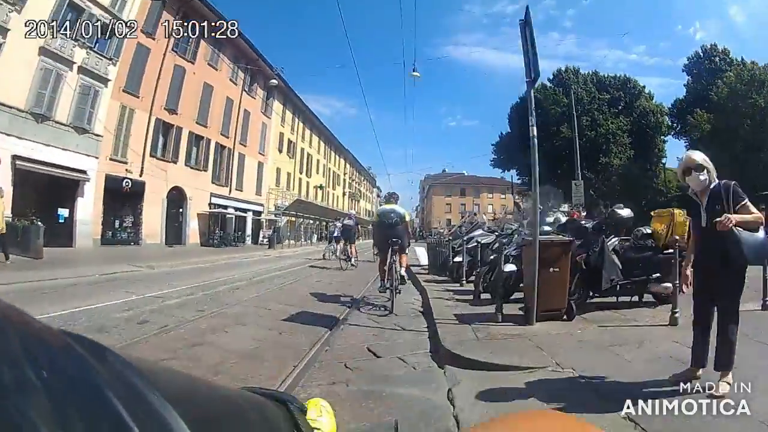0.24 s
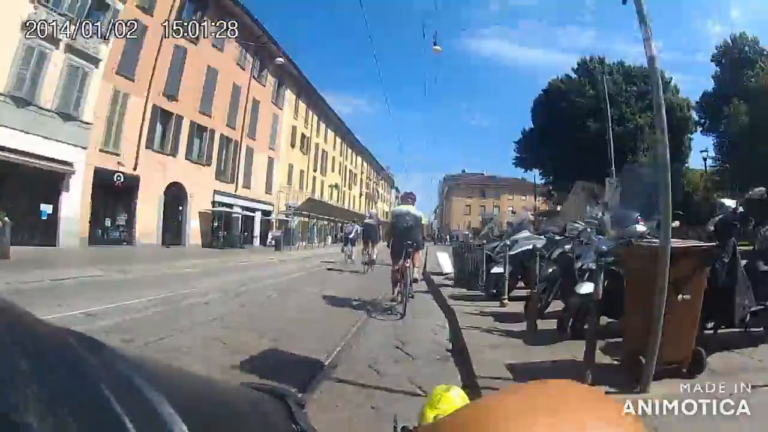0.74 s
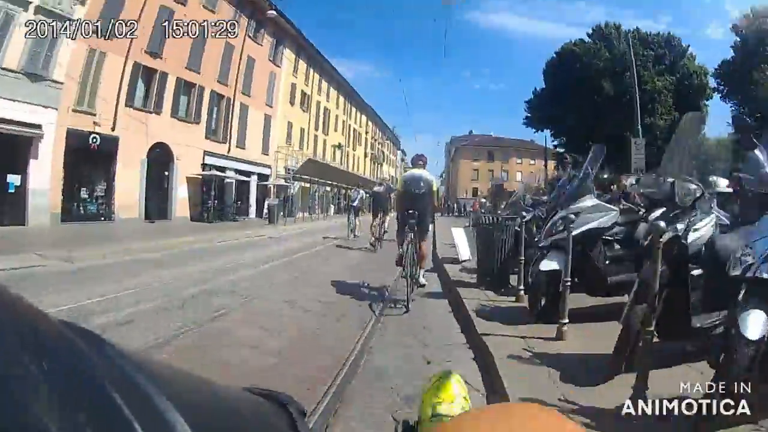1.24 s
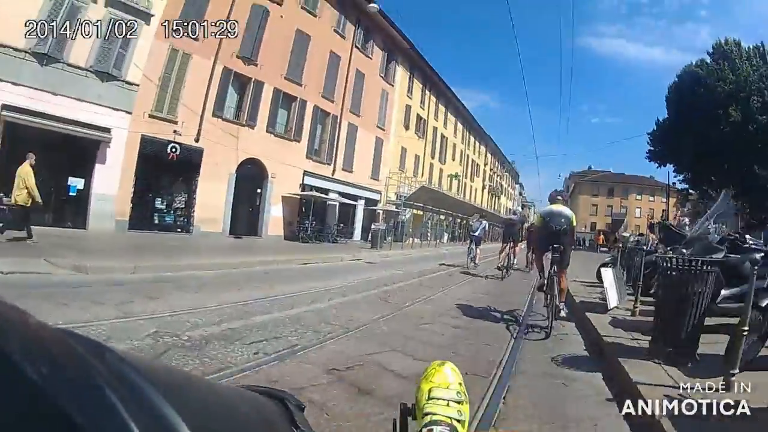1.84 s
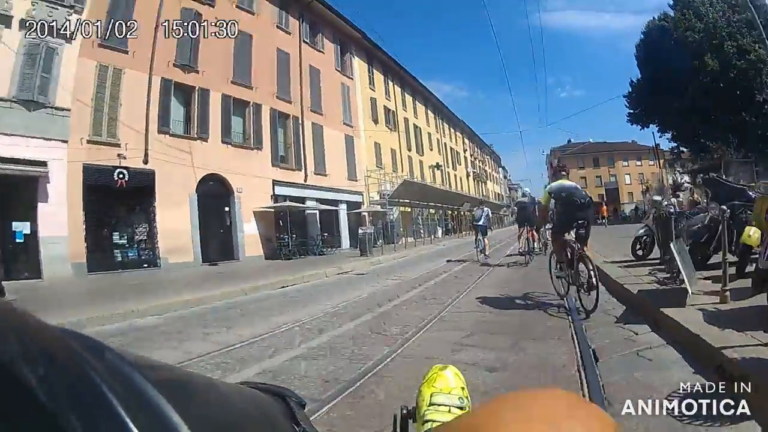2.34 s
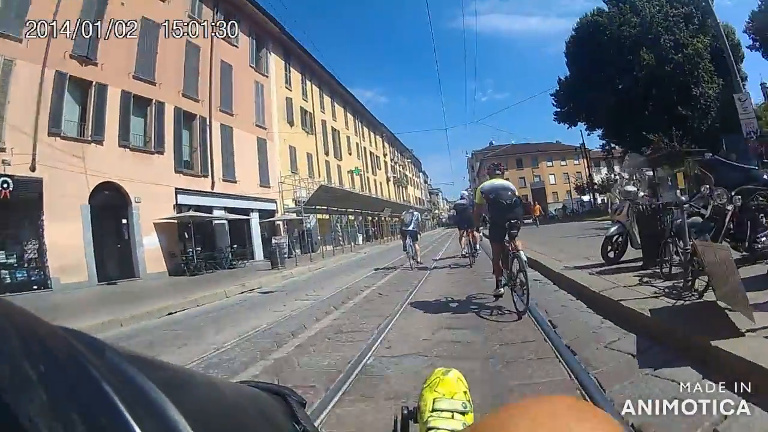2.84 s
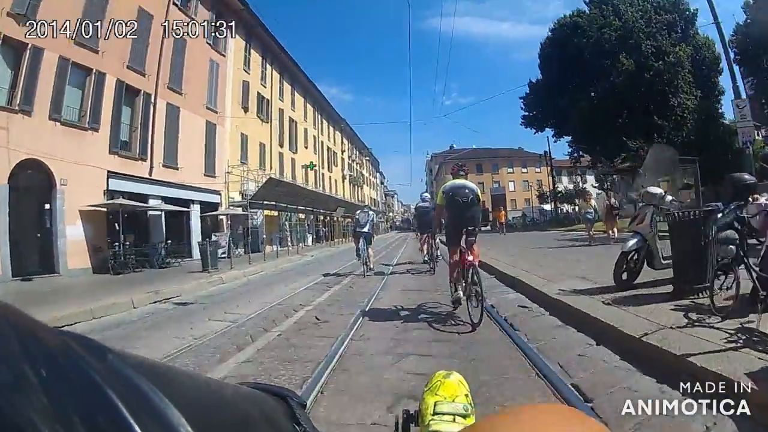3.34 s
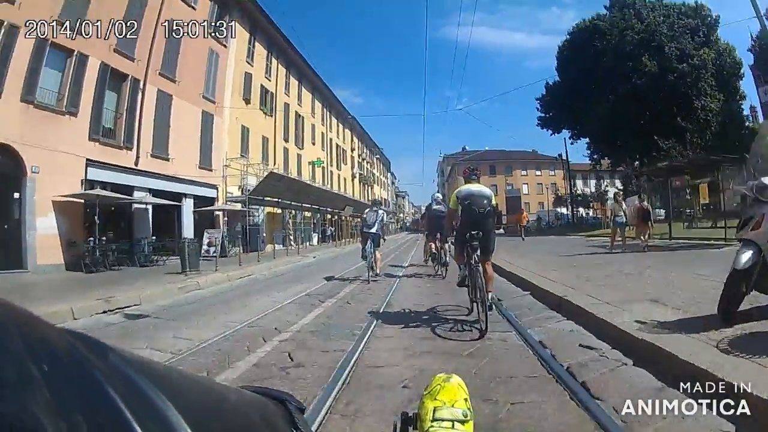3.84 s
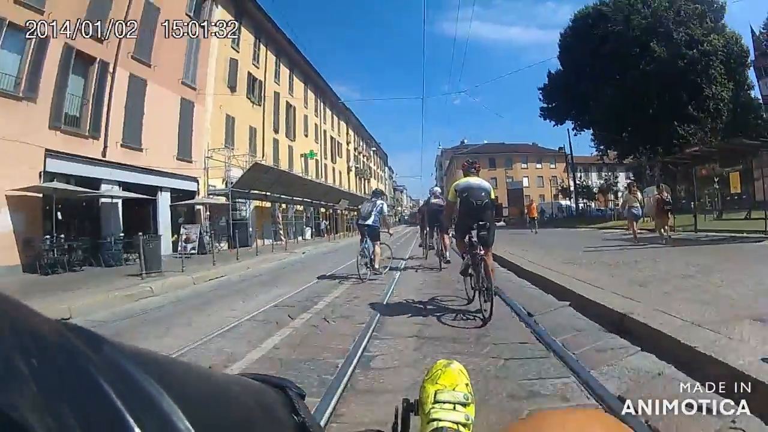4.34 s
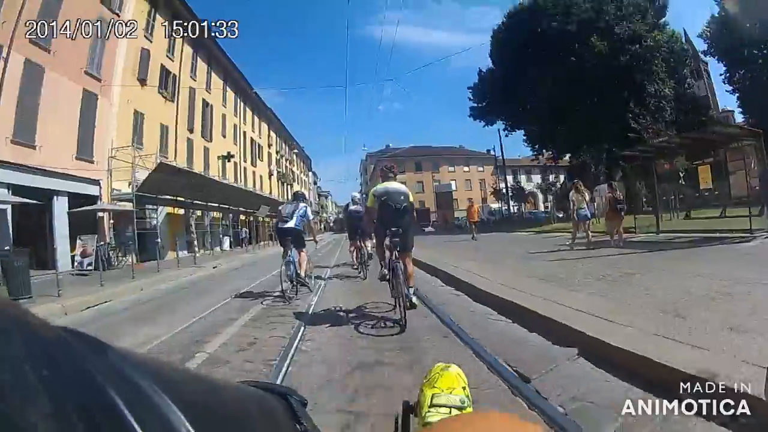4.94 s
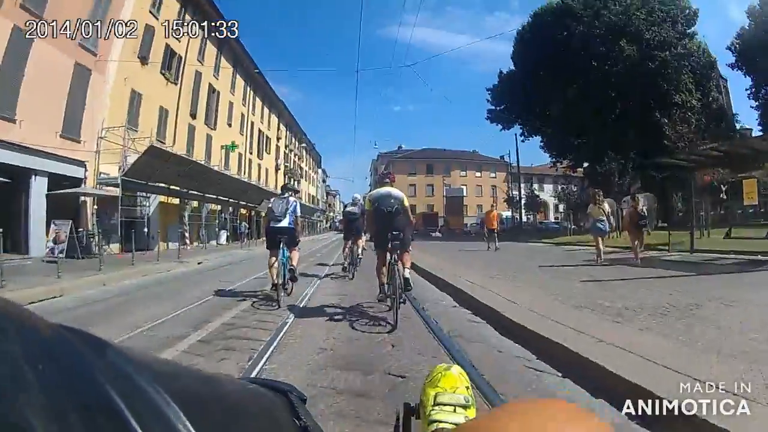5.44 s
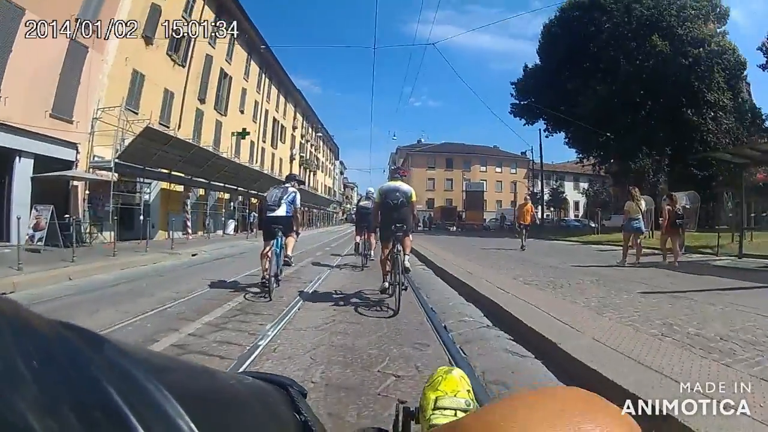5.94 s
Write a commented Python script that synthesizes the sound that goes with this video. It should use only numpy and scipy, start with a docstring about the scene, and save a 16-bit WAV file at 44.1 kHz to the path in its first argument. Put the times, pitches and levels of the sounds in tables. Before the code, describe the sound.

A camera in a closed case, fixed to a pedal trike, picks up about six seconds of stone paving. Rough tyre grind, low frame hum, gritty ticks and tiny jingling parts start at once, with a hard knock almost immediately. From 0.3 to 1.1 s knocks crowd together, the strongest near 0.47 s crunching the microphone, with short bursts of rattling and hollow woody thumps. Chatter is sparser until 1.85 s; from about 2.5 to 3.5 s the grind sinks, though single knocks persist near 2.9, 3.04 and 3.4 s. Chain links tick quickly, about thirty a second, faster around 2.5 s and 5.8 s. Roughness surges at 3.6-4.1 s with clattering jolts. Thin squeaks slide up and back down at 4.4 and 4.6 s, with a faint echo. Hard knocks return at 5.3 s and 5.95 s over a quieter grind. Treble stays muffled, sound close and dry.

```python
"""Tyres grind over rough stone from the start, with gritty ticks, jingling parts and a hard knock almost at
once. It is a pedal trike on stone paving, heard by a camera in a closed case fixed to the frame. Road noise is
shaped random contacts and hum; knocks, thumps, chain ticks and loose parts are short dying rings. Jolts set off
bursts of chatter; later something squeaks twice, as two sliding tones. The hardest knocks overload the
microphone, and there is little treble above about 5 kHz."""
import sys
import numpy as np
from scipy import signal
from scipy.fft import rfft, irfft, next_fast_len
from scipy.io import wavfile
from scipy.ndimage import map_coordinates

SR = 44100
rng = np.random.default_rng(int(sys.argv[2]) if len(sys.argv) > 2 else 0)


def unload_wav(signal):
    """Save mono or channel-first audio to the path in sys.argv[1] as 16-bit WAV at rate SR, clipped to [-1, 1]."""
    wavfile.write(
        sys.argv[1],
        SR,
        np.round(np.clip(np.atleast_2d(signal).T, -1, 1) * 32767).astype(np.int16),
    )


N = 272538

# Tyres on the stone as the ride goes on: t/s, grind level/dB, frame hum level/dB (before each layer's own gain)
ROAD_LEVELS = [(0.0, -28, -40), (0.14, -25, -37.5), (0.58, -26.5, -38.5), (0.95, -25, -36.5),
               (1.38, -27, -40.5), (2.05, -26, -42), (2.58, -32, -44.5), (3.44, -33, -43), (3.72, -24, -41),
               (4.1, -30, -40.5), (4.39, -28.5, -43.5), (5.18, -28, -43.5), (5.73, -34, -47),
               (6.18, -28.5, -42)]
# Tone colour of the tyre grind: f/Hz, relative level per Hz/dB
GRIND_SPECTRUM = [(300, -46), (900, -18), (1150, -13.5), (1370, 4), (1580, -10.5), (1950, 2), (2400, -12.5),
                  (2850, -8), (3600, -20), (4500, -21.5), (6000, -26.5), (12000, -31.5)]
# Tone colour of the frame hum: f/Hz, relative level per Hz/dB
HUM_SPECTRUM = [(20, -29.5), (60, -13.5), (160, -25.5), (280, -15.5), (400, -13.5), (510, -5), (610, -2),
                (740, -3.5), (950, -13), (1400, -29), (3000, -74)]
# Hard knocks of the mount: t/s, level/dB (before the gain in knocks)
HARD_KNOCKS = [(0.026, 7.5), (0.2, 0.5), (0.341, 2.5), (0.347, 6), (0.4126, 3), (0.4633, 4), (0.4719, 11),
               (0.5393, 8.5), (0.5597, -9.5), (0.6004, 0), (0.7035, -3), (0.7536, -1.5), (0.7778, 5.5),
               (0.835, 1.5), (0.897, 6), (0.9222, -6.5), (0.9499, -2.5), (1.0217, -1), (1.1231, -1),
               (1.283, 0), (1.4214, -6), (1.535, -4), (1.7654, 4), (1.8347, 3.5), (1.9478, -9.5),
               (2.2943, 1.5), (2.495, -5.5), (2.591, -6), (2.7367, -12), (2.882, 5.5), (3.011, 2),
               (3.0372, 5.5), (3.1844, -11.5), (3.2111, -3.5), (3.379, 5.5), (3.5978, 1), (3.736, -5.5),
               (3.9002, 4.5), (3.9357, 3), (3.9517, -3), (3.961, 1), (4.0085, 4.5), (4.104, -6),
               (4.2143, 0), (4.3695, 1.5), (4.7863, -9.5), (5.157, 0.5), (5.2819, 5.5), (5.34, 7.5),
               (5.4886, -4), (5.5844, -8), (5.7889, -10.5), (5.9547, 5.5), (6.0092, -2)]
# What the mount rings with beside its main pitch: f/Hz, level/dB, time to fall 60 dB/s
MOUNT_MODES = [(528, -33.5, .025), (1355, -13, 0.022), (1928, -7.5, 0.011), (2337, -12, 0.0073),
               (2842, -8, 0.0099), (3275, -15.5, 0.0082), (3792, -15.5, 0.0078), (4480, -15.5, .006)]
# The chain's pace and pull: t/s, links per second/Hz, tick level/dB (before the gain in chain)
CHAIN_PACE = [(0, 33.8, -25), (1.1, 31, -25), (2.15, 36.5, -26), (2.45, 56, -21.5), (2.85, 49, -26),
              (3.15, 31.2, -28), (3.7, 30.2, -20.5), (4.55, 25, -17), (4.75, 40, -19.5), (5.7, 48, -19),
              (5.88, 58.4, -17.5), (6.05, 32.5, -19.5)]
# What a chain link rings with: f/Hz, level/dB, time to fall 60 dB/s
LINK_MODES = [(1287, -12.5, 0.015), (1760, -9, 0.014), (2045, -2.5, 0.019), (2570, -8.5, 0.0044),
              (2690, -8, 0.014), (3370, -13.5, 0.0026)]
# Loose parts chatter after a jolt: t/s, length/s, level/dB (before each layer's own gain)
JOLTS = [(0.369, 0.014, -9), (0.428, 0.021, -19.5), (0.47, 0.015, -5.5), (0.494, 0.015, -5),
         (0.531, 0.012, -8), (0.703, 0.024, -12), (0.771, 0.018, -10.5), (0.805, 0.011, -7),
         (0.824, 0.027, -18), (0.94, 0.029, -17.5), (1.125, 0.011, -5), (1.473, 0.022, -22.5),
         (1.55, 0.022, -21), (1.846, 0.03, -12.5), (2.132, 0.0087, -21), (3.536, 0.016, -13),
         (3.668, 0.012, -17.5), (3.881, 0.019, -17), (3.961, 0.012, -13.5), (4.009, 0.02, -4.5),
         (4.039, 0.023, -6.5), (4.296, 0.014, -14.5), (4.365, 0.006, -9), (5.156, 0.022, -14.5)]
# Resonances of the case under chatter: f/Hz, width/Hz, relative level/dB
CASE_MODES = [(1310, 184, -0.5), (1723, 930, -4), (2030, 282, 0), (2760, 190, -11), (3600, 2300, -18)]
# Resonances of the frame under chatter: f/Hz, width/Hz, relative level/dB
FRAME_MODES = [(519, 68.6, 2), (755, 124, 3.5), (930, 980, -8.5)]
# Squeaks: t/s, slide up/s, lull/s, slide down/s
SQUEAK_TIMES = [(4.408, .041, .058, 0.023), (4.625, .022, .079, 0.051)]
# How the treble falls away: f/Hz, level/dB
TREBLE_CUT = [(2500, 0), (3300, -3.5), (4300, -9), (5000, -16), (5700, -26.5), (6300, -35.5),
              (7500, -34.5), (8200, -49), (9000, -28), (10500, -23.5), (13000, -27.5), (15000, -25),
              (16000, -40.5)]

# The road noise swells around a jolt: level against it, reach in time
SHAKE_DB, SHAKE_S = -16, 0.048
# Main pitch that the mount settles on, its scatter from knock to knock as a fraction
KNOCK_HZ, KNOCK_SPREAD = 1359, 0.031
# Light taps of the mount: level over the tyre grind before the gain in knocks, its spread
TAP_DB, TAP_SPREAD_DB = 9, 3.5
# Hollow thumps of the frame: pitch, its scatter in natural-log units
THUMP_HZ, THUMP_SPREAD = 749, 0.04
# A paving joint: level over the frame hum before the gains in thumps, its spread
JOINT_DB, JOINT_SPREAD_DB = 16.5, 2
# The frame lands again after each hard knock: delay, level before the gains in thumps
REBOUND_S, REBOUND_DB = 0.027, -29
# The frame's boom in a 0 dB jolt; dB it gains per dB of jolt
BOOM_DB, BOOM_GROWS = -10.5, 0.69
# Ends of the squeak slides, and the faint note between; levels are before the resonance
SQUEAK_LOW_HZ, SQUEAK_HIGH_HZ, SQUEAK_DB = 2880, 3700, -6.5
LULL_HZ, LULL_DB = 2290, -14
# The slides are loudest as they pass this resonance
SQUEAK_BODY_HZ, SQUEAK_WIDTH_HZ = 3300, 164


def amp(db):
    """Turn decibels into a plain gain."""
    return 10 ** (np.asarray(db) / 20)


def unit(x):
    """Scale a sound to rms 1."""
    return x / np.sqrt(np.mean(x ** 2) + 1e-20)


def along(points, hz):
    """Read a (Hz, value) curve at any frequency, along a log axis."""
    f, value = np.transpose(points)
    return np.interp(np.log(hz + 1), np.log(f + 1), value)


def curves(rows):
    """Give one value per sample for each column after the time."""
    s, *columns = np.transpose(rows)
    return [np.interp(np.arange(N) / SR, s, column) for column in columns]


def wobble(rate):
    """Draw a smooth random curve with so many knots a second."""
    knots = rng.standard_normal(int(N * rate / SR) + 4)
    return map_coordinates(knots, [np.arange(N) * rate / SR])


def bounded_normal(size):
    """Draw bell-shaped random numbers held between -2 and 2."""
    return np.clip(rng.standard_normal(size), -2, 2)


def scattered(count):
    """Pick sample positions, one at a chance moment in each equal stretch of the ride."""
    return ((np.arange(count) + rng.random(count)) * N / count).astype(int)


def filtered(x, response):
    """Shape a sound by a complex response to frequency."""
    padded = next_fast_len(N + SR // 2)
    spectrum = rfft(x, padded) * response(np.fft.rfftfreq(padded, 1 / SR))
    return irfft(spectrum, padded)[..., :N]


def resonate(x, modes):
    """Ring a sound through (Hz, width, dB) resonances, keeping the power of white noise."""
    def response(f):
        total = 0
        for k, (centre, width, db) in enumerate(modes):
            peak = 1j * f * width / (centre * centre - f * f + 1j * f * width)
            # each resonance radiates poorly below its own pitch
            radiation = 1j * f / (centre + 1j * f)
            total = total + (-1) ** k * amp(db) * peak * radiation
        return total / np.sqrt(np.mean(np.abs(total) ** 2))
    return filtered(x, response)


def add(track, s, sound):
    """Mix a sound into the track at time s."""
    part = track[max(round(s * SR), 0):][:len(sound)]
    part += sound[:len(part)]


def contacts(rate, spread_db):
    """Make tiny impacts of uneven size at random moments, rms 1."""
    hits = rng.random(N) < rate / SR
    signs = rng.choice([-1, 1], N)
    return unit(hits * signs * amp(spread_db * bounded_normal(N)))


def pings(times, db, hz, cycles, attack):
    """Make short damped rings that die by 60 dB in so many cycles, each with its own time, level and pitch."""
    t = np.arange(SR // 60) / SR
    turns = hz[:, None] * t
    decay = amp(db[:, None] - 60 * turns / cycles)
    rings = decay * np.sin(2 * np.pi * turns) * (1 - np.exp(-t / attack))
    at = np.maximum(times * SR, 0).astype(int)[:, None] + np.arange(len(t))
    return np.bincount(at.ravel(), rings.ravel(), N)[:N]


def roughness():
    """Follow the paving's grind level in dB per sample, adding the power of a swell around each jolt."""
    s = np.arange(0, N, 100) / SR  # a coarse time grid is enough for the swells
    shake = np.zeros(len(s))
    for start, length, db in JOLTS:
        distance = np.abs(s - start - length / 2)
        shake += amp(db + SHAKE_DB) ** 2 * np.exp(-distance / SHAKE_S)
    paving = amp(curves(ROAD_LEVELS)[0]) ** 2
    return 10 * np.log10(paving + np.interp(np.arange(N) / SR, s, shake))


def tyres(road_db, grind_db=-4, hum_db=0):
    """Rough stone shakes the frame in quick bumps, heard as a grind of tiny contacts and a low hum."""
    hum_level = curves(ROAD_LEVELS)[1]
    bumps = wobble(150)
    grind = unit(filtered(contacts(rate=3600, spread_db=0.0), lambda f: amp(along(GRIND_SPECTRUM, f))))
    hum = unit(filtered(rng.standard_normal(N), lambda f: amp(along(HUM_SPECTRUM, f))))
    grind_gain = amp(road_db + grind_db + 5.57 * bumps)
    hum_gain = amp(hum_level + hum_db + 2 * bumps + 1.8 * wobble(45))
    return grind_gain * grind + hum_gain * hum


def grit(road_db, count=700, centre_hz=3900, spread=0.091, level_db=-11, size_db=5, cycles=45,
         attack=0.0001, crush_db=-12):
    """Sand grains snap under the tyres as bright little ticks, and crunch in a cluster under each jolt."""
    at = rng.integers(0, N, count)
    loose = np.c_[at / SR, road_db[at] + level_db]
    crushed = [(s + length * u, db + crush_db) for s, length, db in JOLTS for u in rng.random(size=8)]
    times, db = np.vstack([loose, crushed]).T
    size, pitch = bounded_normal((2, len(times)))
    return pings(times, db + size_db * size, centre_hz * np.exp(spread * pitch), cycles, attack)


def jingling(road_db, count=420, centre_hz=1850, spread=0.2, level_db=7, cycles=20, attack=0.00036,
             size_db=5):
    """Small loose parts tap all the time, harder on rougher stone, each at its own pitch."""
    at = scattered(count)
    size, pitch = bounded_normal((2, count))
    db = road_db[at] + level_db + size_db * size
    return pings(at / SR, db, centre_hz * np.exp(spread * pitch), cycles, attack)


def taps(road_db):
    """Place light knocks of the mount at chance moments, stronger on rougher stone, as (s, dB)."""
    at = scattered(count=26)
    db = road_db[at] + TAP_DB + TAP_SPREAD_DB * bounded_normal(len(at))
    return list(zip(at / SR, db))


def knocks(blows, t60=0.0105, attack=0.001, crack_db=-13, crack_t60=0.0021, level_db=1.5, detune=0.049,
           stiff=0.37, release=0.001806, size_db=3.5):
    """Each knock rings the mount for a few milliseconds, with a short noisy crack at its start."""
    out, t = np.zeros(N), np.arange(SR // 20) / SR
    # while the parts touch the mount is stiffer, so the main ring starts higher and settles
    bent_time = t - stiff * release * np.exp(-t / release)
    swell = 1 - np.exp(-(t / attack) ** 2)
    for s, db in blows:
        main_hz = KNOCK_HZ * (1 + KNOCK_SPREAD * rng.standard_normal())
        ring = np.sin(2 * np.pi * main_hz * bent_time) * amp(-60 * t / t60)
        for mode_hz, mode_db, mode_t60 in MOUNT_MODES:
            hz = mode_hz * (1 + detune * rng.standard_normal())
            wave = np.sin(2 * np.pi * (hz * t + rng.random()))
            ring += amp(mode_db + size_db * rng.standard_normal() - 60 * t / mode_t60) * wave
        crack = amp(crack_db - 60 * t / crack_t60) * rng.standard_normal(len(t))
        add(out, s, amp(db + level_db) * (2 * ring * swell + crack))
    return out


def chain(size_db=2, detune=0.03, level_db=11, rise=0.0027, stiff=0.2):
    """Each link slides onto a tooth with a soft metallic tick that sinks as it seats; the pace follows the pedals."""
    out, t = np.zeros(N), np.arange(SR // 30) / SR
    pace, tick_db = curves(CHAIN_PACE)
    # a link seats each time the running count passes a whole number
    seats = np.flatnonzero(np.diff(np.floor(np.cumsum(pace) / SR)))
    bent_time = t - stiff * rise * np.exp(-t / rise)
    swell = 1 - np.exp(-(t / rise) ** 2)
    for i in seats:
        ring = np.zeros(len(t))
        for hz, mode_db, t60 in LINK_MODES:
            size, pitch, phase = rng.standard_normal(3)
            wave = np.sin(2 * np.pi * (hz * (1 + detune * pitch) * bent_time + phase))
            ring += amp(mode_db + size_db * size - 60 * t / t60) * wave
        add(out, i / SR, amp(tick_db[i] + level_db) * ring * swell)
    return out


def thumps(t60=0.018, attack=0.0028, level_db=9, rough=0.82, clack_db=-2, clack_t60=0.049):
    """Paving joints and knock rebounds clack the case and ring the hollow frame with a blurred, woody pitch."""
    out, clacks, t = np.zeros(N), np.zeros(N), np.arange(SR // 12) / SR
    blur = rough * wobble(300)  # phase wander in radians
    at = scattered(count=45)
    joint_db = curves(ROAD_LEVELS)[1][at] + JOINT_DB + JOINT_SPREAD_DB * bounded_normal(len(at))
    joints = list(zip(at / SR, joint_db))
    rebounds = [(s + REBOUND_S, REBOUND_DB) for s, _ in HARD_KNOCKS]
    for s, db in joints + rebounds:
        hz = THUMP_HZ * np.exp(THUMP_SPREAD * rng.standard_normal())
        phase = 2 * np.pi * hz * t + np.roll(blur, -round(s * SR))[:len(t)]
        envelope = amp(db + level_db - 60 * t / t60) * (1 - np.exp(-t / attack))
        add(out, s, envelope * np.sin(phase))
        add(clacks, s, amp(db + clack_db - 60 * t / clack_t60))
    return out + resonate(clacks * contacts(rate=1200, spread_db=2), CASE_MODES)


def rattles(edge=0.0019, case_db=-4, bounce=0.0031, bounce_db=7, bounce_hz=1750, cycles=16):
    """A jolt sets off a volley of bounces and fine contacts that rings the case and the frame."""
    shake, boom, t = np.zeros(N), np.zeros(N), np.arange(SR // 20) / SR
    chatter = contacts(rate=3500, spread_db=2.0)
    bounces = np.zeros(N)
    for s, length, db in JOLTS:
        volley = np.exp(-np.maximum(t - length, 0) / edge)  # steady, then a quick fade
        add(shake, s - edge / 2, amp(db) * volley)
        add(boom, s - edge / 2, amp(BOOM_DB + BOOM_GROWS * db) * volley)
        gap, size, pitch = rng.standard_normal((3, 16))
        after = np.cumsum(bounce * np.exp(0.42 * gap)) - bounce
        on = after < length  # only bounces within the volley sound
        level = db + bounce_db + 3.4 * size[on]
        hz = bounce_hz * np.exp(0.13 * pitch[on])
        bounces += pings(s + after[on], level, hz, cycles, edge / 4)
    case = amp(case_db) * resonate(shake * chatter, CASE_MODES)
    frame = resonate(boom * chatter, FRAME_MODES)
    return bounces + case + frame


def squeaks(waver=0.004, echo_db=-20, echo_t60=0.39):
    """A thin squeak slides up, drops to a faint lower note and slides back down; the street answers faintly."""
    out = np.zeros(N)
    for s, up, lull, down in SQUEAK_TIMES:
        pieces = [(up, SQUEAK_LOW_HZ, SQUEAK_HIGH_HZ, SQUEAK_DB),
                  (lull, LULL_HZ, LULL_HZ, LULL_DB),
                  (down, SQUEAK_HIGH_HZ, SQUEAK_LOW_HZ, SQUEAK_DB)]
        for length, start_hz, end_hz, db in pieces:
            u = np.linspace(0, 1, int(length * SR))
            hz = (start_hz + (end_hz - start_hz) * u) * (1 + waver * wobble(560)[:len(u)])
            body = 1 / np.hypot(1, (hz - SQUEAK_BODY_HZ) / SQUEAK_WIDTH_HZ)
            tone = np.sin(2 * np.pi * np.cumsum(hz) / SR)
            add(out, s, amp(db) * body * np.sin(np.pi * u) * tone)
            s += length
    t = np.arange(SR // 3) / SR
    tail = rng.standard_normal(len(t)) * amp(-60 * t / echo_t60)
    echo = signal.fftconvolve(out, tail / np.linalg.norm(tail))[:N]
    return out + amp(echo_db) * echo


def scene():
    """Everything reaches the camera through its mount, as one signal copied to both sides."""
    road_db = roughness()
    road = tyres(road_db) + grit(road_db) + jingling(road_db)
    mount = knocks(list(HARD_KNOCKS) + taps(road_db))
    mix = road + mount + chain() + thumps() + rattles() + squeaks()
    return np.tile(mix, (2, 1))


def record(dry, hardness=3.5, top=0.88, bottom=0.82, lag=0.000022, top_hz=16000):
    """The microphone saturates unevenly, the treble is cut off, and the left side lags the right by lag
    seconds."""
    limit = np.where(dry > 0, top, bottom)
    clipped = dry / (1 + np.abs(dry / limit) ** hardness) ** (1 / hardness)

    def cut_and_lag(f):
        sides = np.array([[-1], [1]])  # left half a lag late, right half a lag early
        shift = np.exp(1j * np.pi * f * lag * sides)
        return amp(along(TREBLE_CUT, f)) * shift * (f < top_hz)
    return filtered(clipped, cut_and_lag)


dry = scene()
out = record(dry)
unload_wav(out)
```